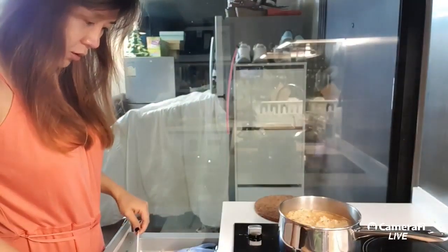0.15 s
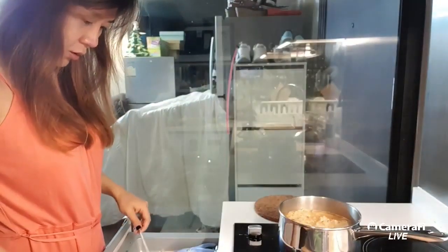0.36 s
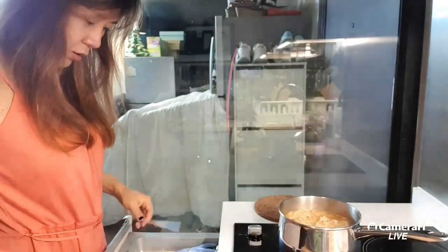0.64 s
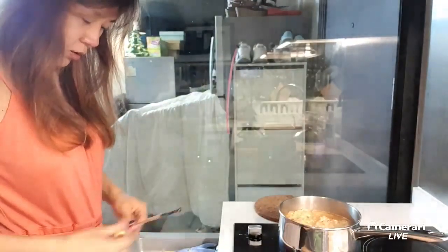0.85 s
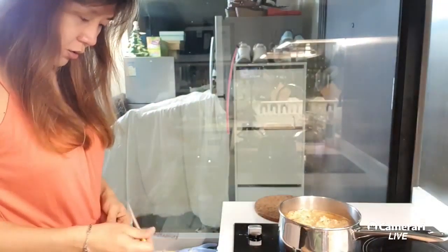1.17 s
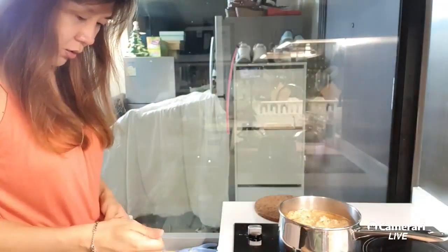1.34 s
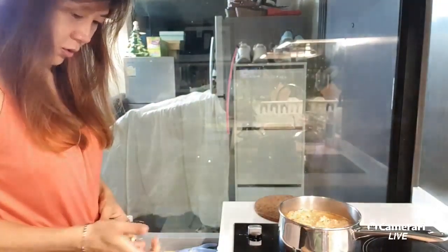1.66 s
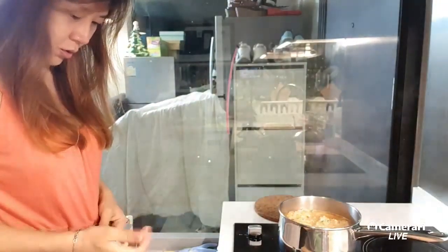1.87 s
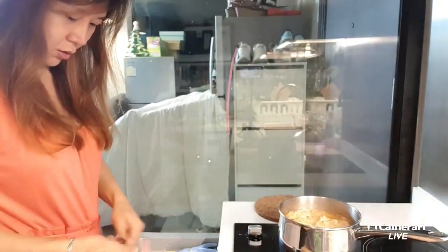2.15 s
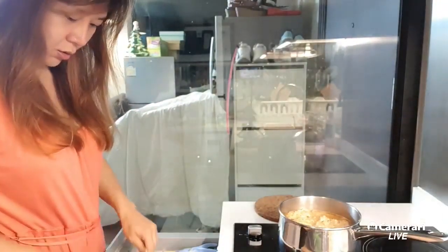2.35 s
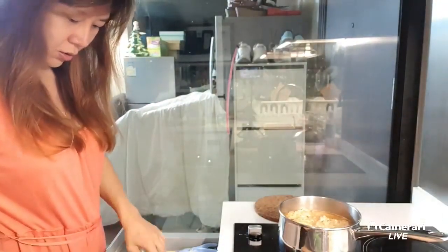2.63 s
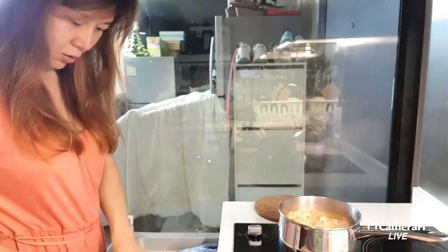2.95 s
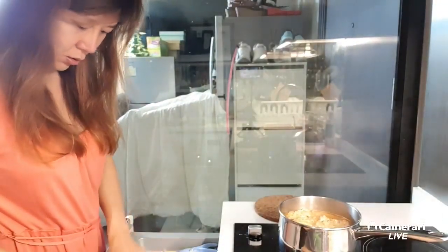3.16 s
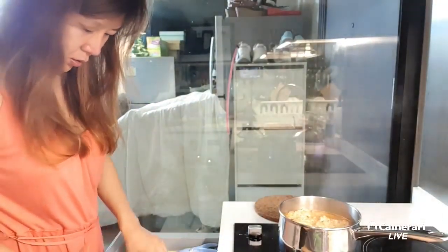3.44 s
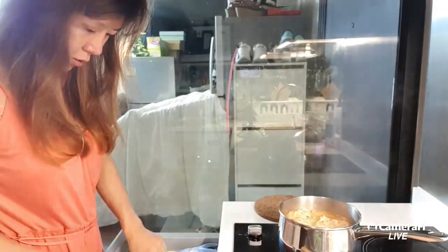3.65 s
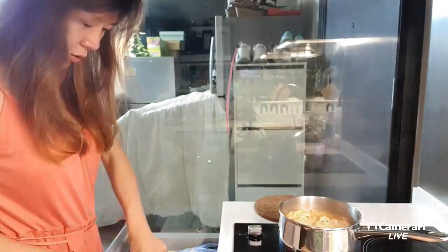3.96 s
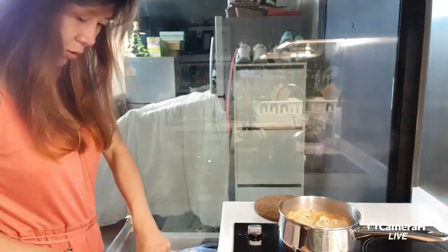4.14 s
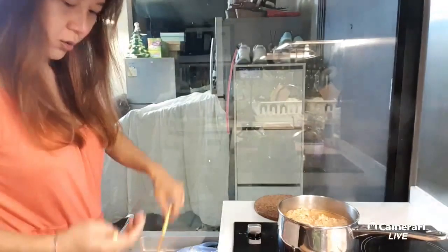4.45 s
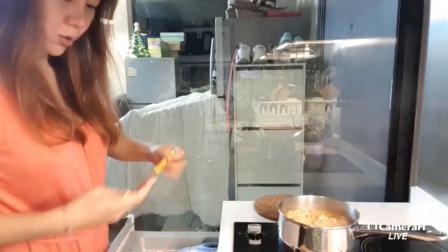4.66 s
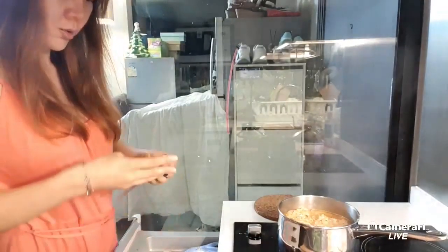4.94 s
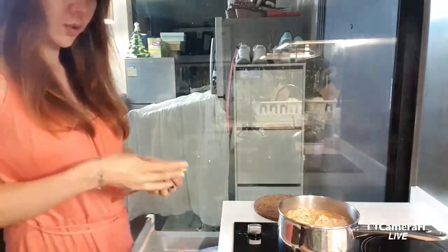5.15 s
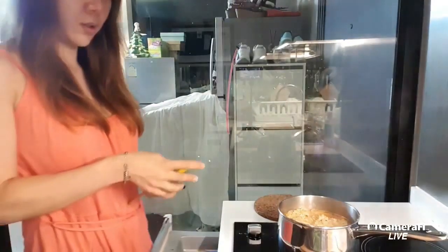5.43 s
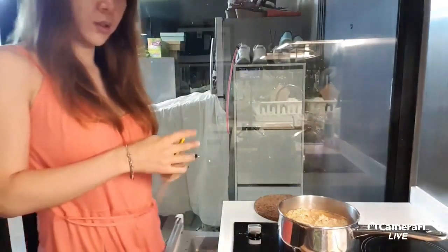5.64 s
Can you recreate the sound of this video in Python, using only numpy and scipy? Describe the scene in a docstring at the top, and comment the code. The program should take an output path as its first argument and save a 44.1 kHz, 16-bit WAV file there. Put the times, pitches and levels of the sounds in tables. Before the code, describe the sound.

From the start, a hand stirs through a kitchen drawer: wooden chopsticks and steel cutlery knock together, scrape and rattle against the tray, with bright ringing clinks near 0.5 and 1 second. From about 1.3 to 2.7 seconds there is a lull, with only faint ticks and soft, dry rubs of wood on wood. At 2.7 seconds the search resumes, busier and louder, mixing hollow tray knocks, clicking sticks and short, high steel jingles. It peaks around 3.2, 3.7 and 4.6 seconds and ends with one last clatter near 4.9 seconds. A few faint ticks follow, and from about 5.2 seconds the floor rumbles softly as the person turns away, with a light wooden rub near 5.8 seconds. The sound is fairly close, and the hard-walled kitchen gives each knock a short, bright echo. Quiet low room noise and the very faint fizz of a simmering pot continue throughout.

```python
"""Chopsticks and steel cutlery knock together and against the tray as a hand searches a kitchen drawer.
Each contact shakes tray, sticks and steel; stirred edges catch and slip; freed pieces ring in their modes.
A bright, hard-walled kitchen answers every knock, and a pot simmers faintly. One last clatter ends the
search, then the floor rumbles softly as the person turns away."""
import sys
import numpy as np
from scipy import signal
from scipy.fft import rfft, irfft
from scipy.io import wavfile

SR = 44100
rng = np.random.default_rng(int(sys.argv[2]) if len(sys.argv) > 2 else 0)


def put_to_file(sound):
    """Save the sound as 16-bit audio at rate SR, in the file named by the first command-line argument."""
    columns = np.atleast_2d(sound).T  # one column per channel
    safe = np.clip(columns, -1, 1)
    whole_steps = np.round(safe * 32767)
    wavfile.write(sys.argv[1], SR, whole_steps.astype(np.int16))


N = 255780
TIME_S = np.arange(N) / SR

# hand strokes through the heap, relative levels: start_s, length_s, wood_db, steel_db
HAND_STROKES = [(0.151, 0.097, -50, -49), (0.354, 0.11, -51.5, -63), (0.496, 0.036, -38, -52),
                (0.676, 0.18, -44.5, -44.5), (1.038, 0.14, -45, -36), (2.923, 0.037, -42, -46.5),
                (3.157, 0.025, -42, -62), (3.184, 0.064, -35, -32), (3.302, 0.0506, -33, -41),
                (3.577, 0.15, -39.5, -39.5), (3.75, 0.18, -42, -47), (3.956, 0.097, -41.5, -47),
                (4.087, 0.035, -45.5, -54.5), (4.231, 0.14, -44.5, -51.5), (4.368, 0.19, -45, -44),
                (4.572, 0.063, -39.5, -34), (4.811, 0.021, -41, -38), (4.862, 0.067, -50.5, -42.5)]


def from_db(db):
    """Decibels to gain."""
    return 10 ** (np.asarray(db) / 20)


def unit_rms(x):
    """Scale to rms 1."""
    return x / np.sqrt(np.mean(x ** 2) + 1e-20)


def unit_energy(x):
    """Scale to energy 1."""
    return x / np.sqrt(np.sum(x ** 2))


def at_hz(points, hz):
    """Interpolate on a log-frequency axis."""
    points_hz, values = np.transpose(points)
    return np.interp(np.log(np.maximum(hz, 1)), np.log(points_hz), values)


def band(x, low_hz, high_hz, order=2):
    """Causal band-pass."""
    sos = signal.butter(order, [low_hz, min(high_hz, SR / 2 - 1)], "band", fs=SR, output="sos")
    return signal.sosfilt(sos, x)


def add(track, start_s, sound):
    """Mix a sound in at start_s."""
    i = max(round(start_s * SR), 0)
    track[i:i + len(sound)] += sound[:N - i]


def body(low_hz, high_hz, resonances, order=3, samples=2048):
    """Impulse response of an object: a pass band lifted at each resonance."""
    response = band(signal.unit_impulse(samples), low_hz, high_hz, order)
    for pitch_hz, width_hz, lift_db in resonances:
        peak = signal.lfilter(*signal.iirpeak(pitch_hz, pitch_hz / width_hz, fs=SR), response)
        response = response + (from_db(lift_db) - 1) * peak
    return unit_energy(response)


def ring(pitch_hz, gains, t60_s):
    """Struck modes: sines that start together and decay."""
    t = TIME_S[:int(np.max(t60_s) * SR)]
    decay = from_db(-60 * t / np.reshape(t60_s, (-1, 1)))
    return gains @ (np.sin(2 * np.pi * np.outer(pitch_hz, t)) * decay)


def kitchen_path(direct_gain, drawer_db, drawer_t60_s):
    """Impulse response from one spot: direct sound, quick drawer echoes, room tail."""
    # kitchen reverberation: low_hz, high_hz, t60_s
    reverb_bands = [(70.5, 480, 0.31), (536, 4700, 0.29), (4400, 7900, 0.26), (10200, 24000, 0.2)]
    t = TIME_S[:SR // 2]
    tail = 0
    for low_hz, high_hz, t60_s in reverb_bands:
        tail = tail + band(rng.standard_normal(len(t)), low_hz, high_hz) * from_db(-60 * t / t60_s)
    path = tail * (1 + from_db(drawer_db - 60 * t / drawer_t60_s))
    path[0] += direct_gain
    return path


def in_room(sound, paths, wet):
    """Direct sound plus one random room path, energy preserved."""
    path = wet * unit_energy(paths[rng.integers(len(paths))])
    path[0] += 1
    return unit_energy(signal.fftconvolve(sound, path)) * np.sqrt(np.sum(sound ** 2))


def drawer_bodies():
    """What a contact shakes: tray with drawer box, sticks, steel, top modes of the steel."""
    # resonances of each body: pitch_hz, width_hz, lift_db
    tray_modes = [(324, 25.5, 11), (446, 11, 11), (562, 42, 12), (714, 21.6, 11)]
    stick_modes = [(1001, 29, 6.3), (1096, 60, 1.9), (1414, 810, 8.7), (3680, 52, 6.7)]
    steel_modes = [(4950, 63, 3.5), (6150, 79, 4.5), (6600, 68, 5.5), (7260, 200, 7.5), (7794, 220, 10.5),
                   (8970, 130, 3)]
    steel_top_modes = [(9630, 87, 5.7), (11190, 110, 7.1), (11450, 130, 4.7), (11900, 240, 4.5),
                       (12870, 170, 4.6), (14500, 160, 12)]
    tray = body(245.6, 1024, tray_modes, order=4)
    box = from_db(-17.5) * body(50, 172, [(185, 20, 11.7)])
    sticks = body(680, 3600, stick_modes)
    steel = body(3710, 9330, steel_modes, order=4)
    steel_top = body(9610, 14900, steel_top_modes, order=4)
    return [tray + box, sticks, steel, steel_top]


def chatter(bounce_s, rebound=0.76, count=4):
    """A first contact and a few uneven, fading rebounds."""
    delays_s = np.cumsum(rng.uniform(0.3, 1.7, count) * bounce_s)
    sizes = rebound ** np.arange(1, count + 1) * rng.normal(0, 1, count)
    train = signal.unit_impulse(SR // 10)
    train[np.minimum((delays_s * SR).astype(int), len(train) - 1)] += sizes
    return unit_energy(train)


def jingle(wood_db, steel_db, top_db, mean_t60_s, count):
    """Pieces caught by chance: short modes at random pitches, damped by the heap."""
    pitch_hz = 1000 + 14500 * (np.arange(count) + rng.random(count)) / count
    spectrum = [(3500, wood_db), (5000, steel_db), (8800, steel_db), (10500, steel_db + top_db)]
    level_db = at_hz(spectrum, pitch_hz) + 3 * rng.standard_normal(count)
    return ring(pitch_hz, from_db(level_db), mean_t60_s * rng.uniform(0.6, 1.4, count))


def knocks(bodies, paths):
    """Knocks and stray ticks at random spots: steel ticks and jingles, sticks and tray rattle."""
    # main knocks, relative levels: start_s, tray_db, wood_db, steel_db, top_re_steel_db
    main_knocks = [(0.001, -45, -45, -44, -3), (0.109, -43, -51.5, -63, 0), (0.18, -40, -46, -44, -2),
                   (0.191, -42, -42, -46.5, 2), (0.364, -51.5, -59, -56, -9), (0.389, -53, -52, -49.5, 0),
                   (0.518, -40, -46, -37.5, -11), (0.538, -48, -34.5, -44, 2),
                   (0.546, -43.5, -37.5, -30, -2.5), (0.585, -40.5, -36.5, -34, 3),
                   (0.815, -49, -50, -42.5, -12), (0.939, -54, -55, -38.5, 3), (0.977, -56, -57, -46, 1),
                   (0.993, -38, -30.5, -33.5, -11), (1.013, -68, -52, -29.5, -4),
                   (1.084, -35.5, -38, -36.5, 8), (1.188, -66, -54, -46, 11.5),
                   (1.293, -70, -56, -45.5, -6), (1.631, -64, -58.5, -54, -17), (2.066, -71, -66, -58, -4),
                   (2.405, -61.5, -61, -59.5, -6), (2.705, -42.5, -38.5, -41, -17),
                   (2.782, -40.5, -40, -32, -8.5), (2.891, -62, -40.5, -33.5, -2),
                   (2.901, -36, -31, -31.5, -4), (3.185, -36.5, -35.5, -33, 2),
                   (3.235, -37, -33.5, -32.5, -1), (3.259, -58, -39, -35.5, 1), (3.304, -36, -42, -29.5, 5),
                   (3.322, -43, -37.5, -32, -2), (3.461, -53, -50.5, -48.5, 1.5),
                   (3.548, -53.5, -56.5, -48.5, -3), (3.625, -44.5, -65, -47, -7),
                   (3.659, -43, -45, -35, -1), (3.712, -38, -31.5, -28.5, 4.5),
                   (3.879, -44, -37, -29.5, -1), (3.968, -43.5, -48, -41, -18),
                   (4.047, -45, -43.5, -39.5, -3), (4.224, -48.5, -51.5, -44.5, -1),
                   (4.344, -40, -45, -38, 0), (4.411, -40.5, -41, -37, -3), (4.447, -41.5, -37, -34.5, 4),
                   (4.48, -35.5, -40, -38.5, 4.5), (4.541, -50, -39, -41, 0), (4.555, -40.5, -32, -27, 3.5),
                   (4.571, -38.5, -33, -27, 4), (4.625, -29.5, -33.5, -35.5, 5.5),
                   (4.712, -43.5, -43, -40, -1), (4.819, -42.5, -49, -49, 3),
                   (4.83, -51.5, -37.5, -37.5, -1), (4.84, -36, -31.5, -30, 6),
                   (4.862, -39.5, -36, -30.5, 6.5), (5.226, -51, -57, -81, -6.5),
                   (5.332, -75, -66, -61, -8), (5.418, -63, -74, -63, 0), (5.625, -74, -70, -64, 3)]
    tray, sticks, steel, steel_top = bodies
    out = np.zeros(N)
    for start_s, tray_db, wood_db, steel_db, top_db in [*main_knocks, *stray_ticks()]:
        tray_and_sticks = from_db(tray_db) * tray + from_db(wood_db) * sticks
        cutlery = from_db(steel_db) * (steel + from_db(top_db) * steel_top)
        rattle = signal.fftconvolve(tray_and_sticks, chatter(bounce_s=0.004))
        tick = signal.fftconvolve(cutlery, chatter(bounce_s=0.0025))
        path = paths[rng.integers(len(paths))]
        add(out, start_s, from_db(-1.5) * signal.fftconvolve(rattle + tick, path))
        add(out, start_s, from_db(-14) * jingle(wood_db, steel_db, top_db, mean_t60_s=0.2, count=13))
    return out


def stray_ticks(spread_db=15, count=36):
    """Faint stray ticks of cutlery against the tray: loosely spaced rows for knocks()."""
    # mean tick, relative levels: tray_db, wood_db, steel_db, top_re_steel_db
    mean_tick = (-76.5, -86, -75.5, -5.5)
    jitter, strength = rng.random((count, 2)).T
    start_s = (np.arange(count) + jitter) / count * N / SR
    offset_db = np.outer(spread_db * (2 * strength - 1), [1, 1, 1, 0])
    return np.column_stack([start_s, np.array(mean_tick) + offset_db])


def room_noise(level_db):
    """Steady, bass-heavy background noise."""
    # background spectrum: frequency_hz, relative_density_db
    air_spectrum = [(24, 4), (45, 3.5), (90, 4.5), (130, -8), (190, -1), (250, -18.5), (400, -4),
                    (700, -14.5), (2000, -15), (3500, -23.5), (5500, -19), (7600, -15), (9500, -29),
                    (11500, -19.5), (15500, -35.5)]
    gains = from_db(at_hz(air_spectrum, np.arange(N // 2 + 1) * SR / N))
    air = irfft(rfft(rng.standard_normal(N)) * gains, N)
    return from_db(level_db) * unit_rms(air)


def simmer(level_db, bubbles_per_s=900):
    """Tiny bubbles in the pot make a fine fizz."""
    bubbles = (rng.random(N) < bubbles_per_s / SR) * rng.standard_normal(N)
    return from_db(level_db) * unit_rms(band(bubbles, 6000, 8540))


def pressure(start_s, length_s, attack_s=0.0053, onset_db=-8.5, release_s=0.053):
    """Hand force over one stroke, 0 to 1: starts gently, presses harder, lets go."""
    corners_s = start_s + np.array([0, min(attack_s, length_s), length_s, length_s + release_s])
    return np.interp(TIME_S, corners_s, [0, from_db(onset_db), 1, 0])


def sliding(bodies, slips_per_s, spread_db):
    """Stirred edges catch and slip: a spray of tiny, uneven contacts on wood and steel."""
    sizes = from_db(spread_db * np.minimum(rng.exponential(1, N), 4))
    signs = rng.choice([-1, 1], N)
    slips = unit_rms(sizes * signs * (rng.random(N) < slips_per_s / SR))
    wood_force, steel_force = sum(np.outer(from_db([wood_db, steel_db]), pressure(start_s, length_s))
                                  for start_s, length_s, wood_db, steel_db in HAND_STROKES)
    tray, sticks, steel, steel_top = from_db([-6, -4, -3, -4])[:, None] * np.array(bodies)
    wood_scrape = signal.fftconvolve(slips * wood_force, tray + sticks)
    steel_scrape = signal.fftconvolve(slips * steel_force, steel + steel_top)
    path = unit_energy(kitchen_path(direct_gain=11, drawer_db=0, drawer_t60_s=0.08))
    return signal.fftconvolve(wood_scrape + steel_scrape, path)[:N]


def flicked_pieces(paths, gain_db, spacing_s):
    """Each stroke flicks steel pieces into brief jingles, harder as it presses on."""
    out = np.zeros(N)
    for start_s, length_s, _, steel_db in HAND_STROKES:
        force = pressure(start_s, length_s)
        for slot_s in np.arange(start_s, start_s + length_s, spacing_s):
            flick_s = slot_s + rng.random() * min(spacing_s, length_s)
            flick = jingle(steel_db - 7, steel_db, top_db=3, mean_t60_s=0.093, count=16)
            gain = from_db(gain_db) * np.interp(flick_s, TIME_S, force)
            add(out, flick_s, gain * in_room(flick, paths, wet=0.68))
    return out


def fork(paths, spread_db=3, rock_s=0.03, touch_step_db=0.2):
    """A jolted fork rings, at times rocking from touch to touch; the contact point weights its modes."""
    # jolts: start_s, level_db, touch_count
    jolts = [(0.547, -31, 3), (.73, -41, 1), (.8, -37, 1), (1.005, -24.5, 4), (3.304, -31, 1),
             (3.713, -27, 1), (3.88, -24.5, 1), (4.432, -30.5, 1), (4.626, -27.5, 1)]
    # bending modes: pitch_hz, relative_db, t60_s
    bending_modes = [(5012, -18, .25), (5744, -16, .3), (6250, -12, .3), (7397, -9, .3), (7745, 0, .24),
                     (7890, -10, .2), (8800, -8, .33), (9910, -13, .4), (11140, -4, .24), (11705, -6, .28),
                     (12215, -5, .28), (12400, -11, .28), (13700, -3, .26), (14450, -4, .26)]
    pitch_hz, mode_db, t60_s = np.transpose(bending_modes)
    out = np.zeros(N)
    for start_s, level_db, touch_count in jolts:
        for k in range(touch_count):
            weights = unit_energy(from_db(mode_db + spread_db * rng.standard_normal(len(pitch_hz))))
            detuned_hz = pitch_hz * rng.normal(1, 0.002, len(pitch_hz))
            touch = ring(detuned_hz, from_db(level_db + k * touch_step_db) * weights, t60_s)
            add(out, start_s + k * rock_s, in_room(touch, paths, wet=0.65))
    return out


def clinks(paths, weak_mode_db=-1.5):
    """Other freed pieces, steel or wood, ring at two pitches each."""
    # struck pieces: start_s, level_db, strong_hz, weak_hz, t60_s
    pieces = [(.585, -38, 7350, 14570, 0.42), (1.291, -34, 5380, 7030, 0.055),
              (2.707, -34.5, 7070, 2640, 0.047), (2.781, -25.5, 6030, 5380, 0.037),
              (3.235, -30, 3680, 9020, 0.12), (3.259, -25.5, 7070, 6600, .06),
              (3.304, -24, 8850, 7900, 0.18), (3.372, -31, 940, 1375, .057),
              (3.622, -37.5, 1940, 13803, 0.2), (3.658, -28, 7100, 5370, 0.041),
              (3.711, -21.5, 14500, 11440, 0.083), (3.713, -22, 8000, 5050, 0.071),
              (4.557, -22.5, 6520, 3662, 0.072), (4.575, -29.5, 6170, 1147, 0.13),
              (4.848, -28.5, 8710, 7311, 0.21), (5.093, -53, 2620, 2390, .08),
              (5.238, -52, 1600, 655, 0.13)]
    out = np.zeros(N)
    for start_s, level_db, strong_hz, weak_hz, t60_s in pieces:
        clink = ring([strong_hz, weak_hz], from_db([level_db, level_db + weak_mode_db]), t60_s)
        add(out, start_s, in_room(clink, paths, wet=0.69))
    return out


def chopstick_rubs(slips_per_s, swell_s=0.026):
    """Dry wood on wood in the fingers: soft swells of fine slips."""
    # rubs: peak_s, level_db
    rubs = [(1.65, -65), (1.812, -64), (2.04, -69.5), (2.4, -66), (2.52, -69), (2.6, -65), (5.762, -63.5)]
    slips = (rng.random(N) < slips_per_s / SR) * rng.standard_normal(N)
    envelope = sum(from_db(level_db) * np.exp(-((TIME_S - peak_s) / swell_s) ** 2)
                   for peak_s, level_db in rubs)
    return envelope * unit_rms(band(slips, 880, 2770, order=4))


def floor_rumble(turn_s, attack_s=0.027):
    """Dull, uneven noise with low room resonances; rises under the turning feet and holds."""
    boom = body(87, 177, [(156, 8.3, 1.3), (188.6, 6.9, 14), (472, 48, 29.7)], order=2, samples=8192)
    envelope = np.interp(TIME_S, [turn_s, turn_s + attack_s], from_db([-78, -60.5]))
    steps_db = -2.5 * rng.uniform(-0.38, 1, 40)
    waver_db = np.interp(TIME_S, np.linspace(0, N / SR, len(steps_db)), steps_db)
    noise = unit_rms(signal.fftconvolve(rng.standard_normal(N), boom)[:N])
    return envelope * from_db(waver_db) * noise


def scene():
    """Drawer and hand over the quiet kitchen, mono."""
    bodies = drawer_bodies()
    paths = [kitchen_path(direct_gain=7, drawer_db=-24, drawer_t60_s=0.13) for _ in range(12)]
    struck = knocks(bodies, paths) + fork(paths) + clinks(paths)
    stirred = sliding(bodies, slips_per_s=500, spread_db=3.5)
    flicked = flicked_pieces(paths, gain_db=-4.5, spacing_s=0.03)
    rubbed = chopstick_rubs(slips_per_s=4000)
    background = room_noise(level_db=-66) + simmer(level_db=-76)
    return (struck + stirred + flicked + rubbed + background + floor_rumble(turn_s=5.16))[None]


def record(dry):
    """High-pass at 34 Hz, steep low-pass at 15850 Hz."""
    high_pass = signal.butter(4, 34, "high", fs=SR, output="sos")
    low_pass = signal.ellip(12, 0.1, 80, 15850, fs=SR, output="sos")
    return signal.sosfilt(low_pass, signal.sosfilt(high_pass, dry))


dry = scene()
out = record(dry)
put_to_file(out)
```